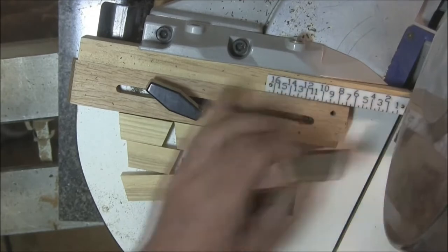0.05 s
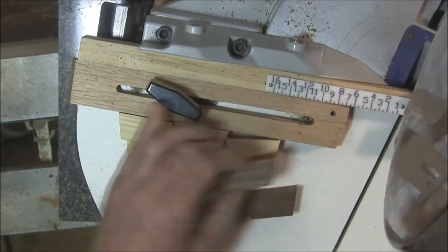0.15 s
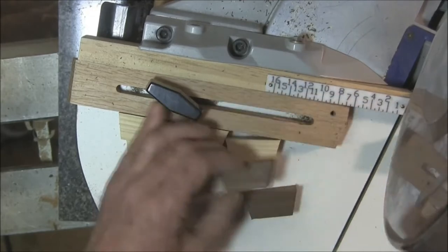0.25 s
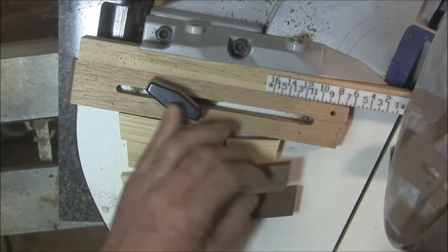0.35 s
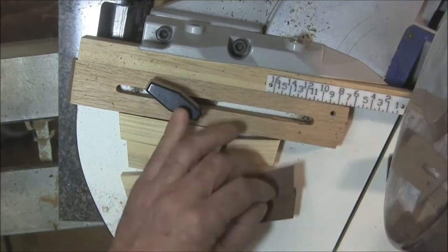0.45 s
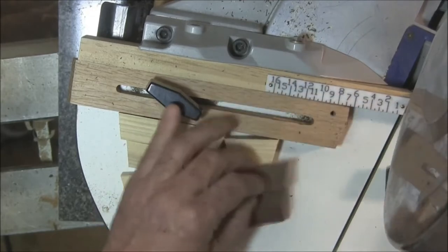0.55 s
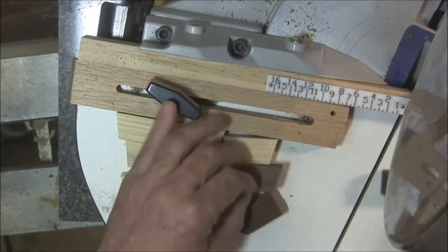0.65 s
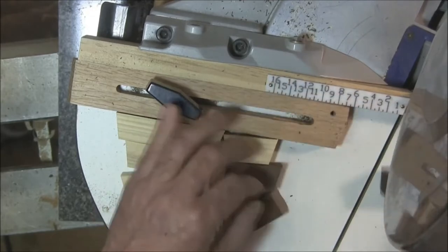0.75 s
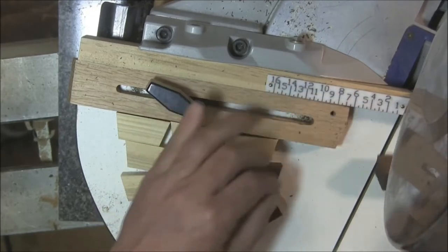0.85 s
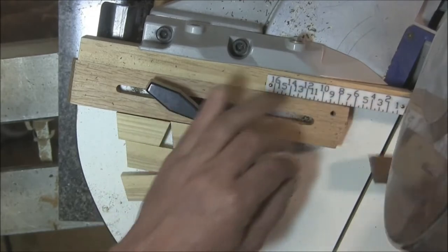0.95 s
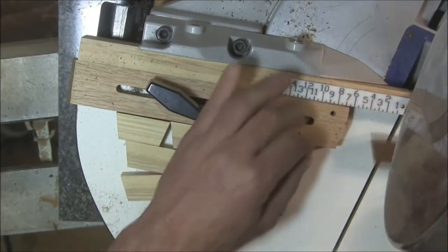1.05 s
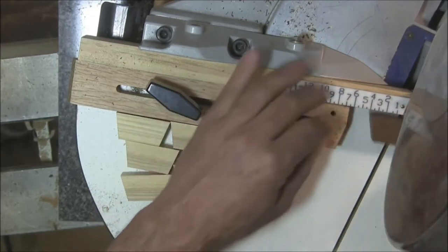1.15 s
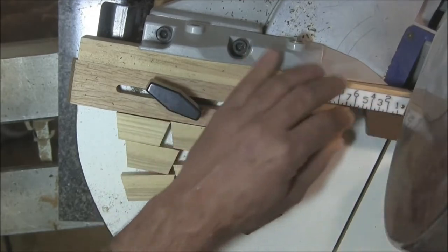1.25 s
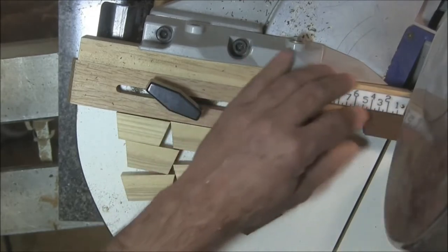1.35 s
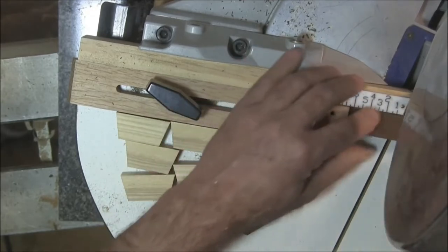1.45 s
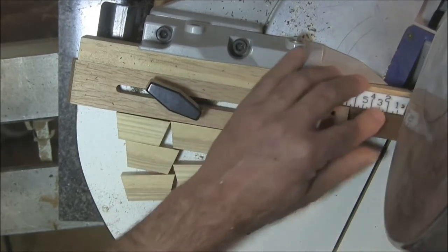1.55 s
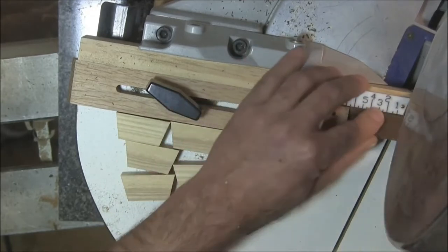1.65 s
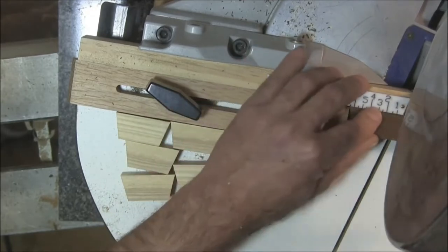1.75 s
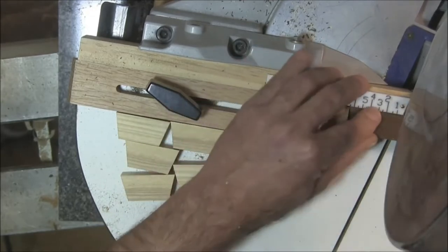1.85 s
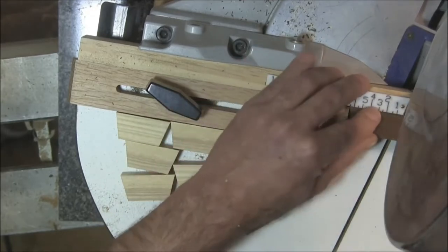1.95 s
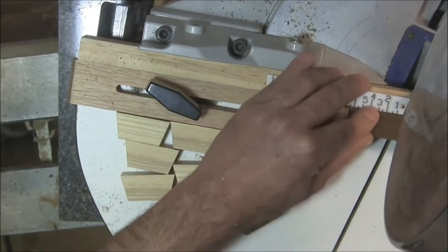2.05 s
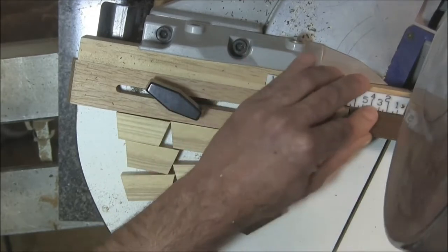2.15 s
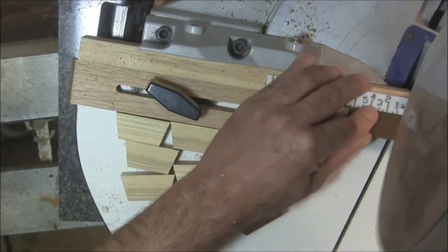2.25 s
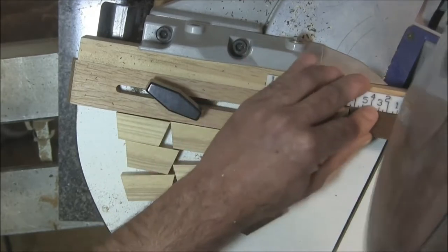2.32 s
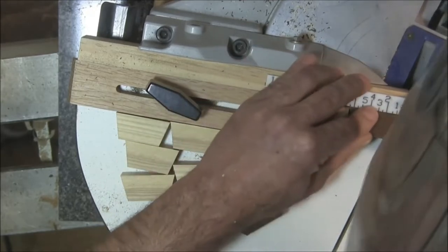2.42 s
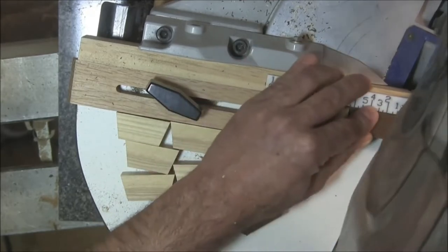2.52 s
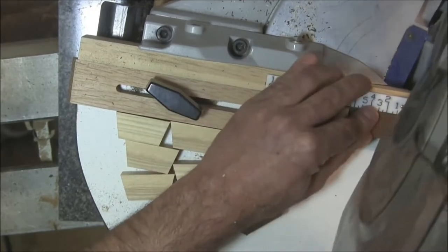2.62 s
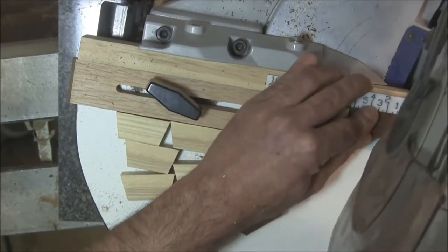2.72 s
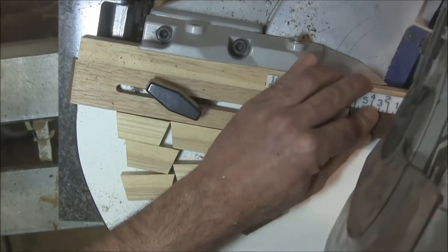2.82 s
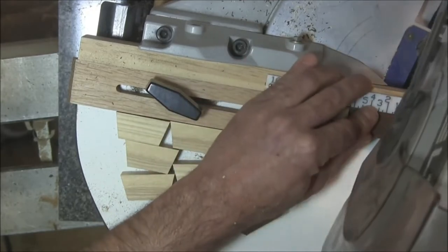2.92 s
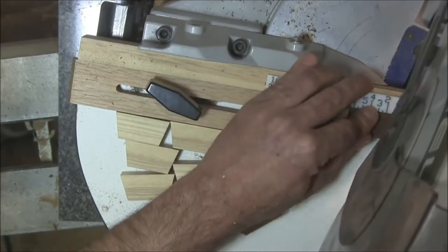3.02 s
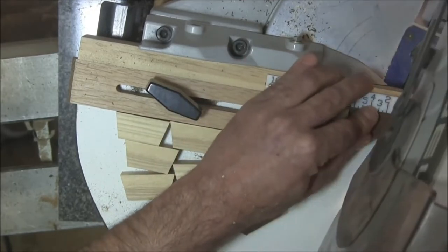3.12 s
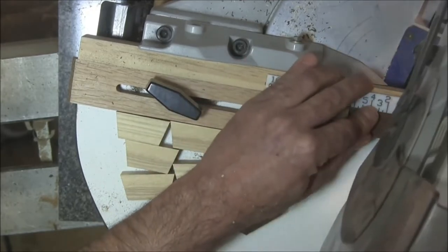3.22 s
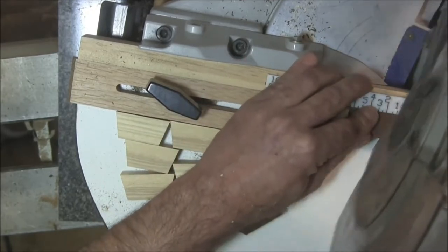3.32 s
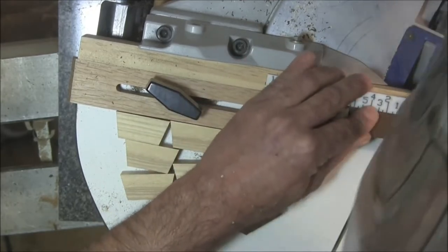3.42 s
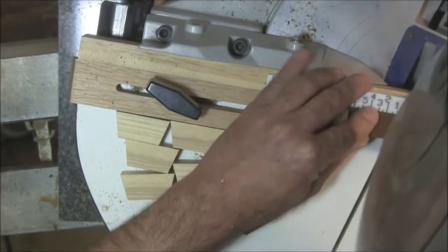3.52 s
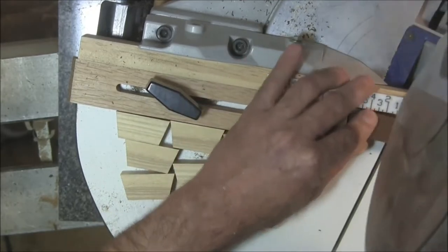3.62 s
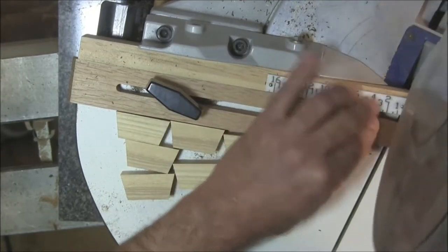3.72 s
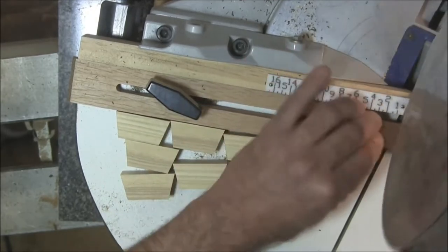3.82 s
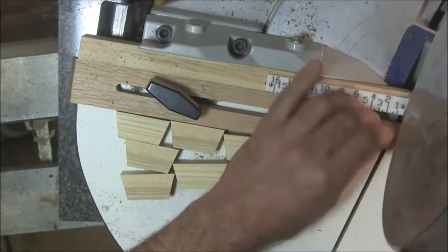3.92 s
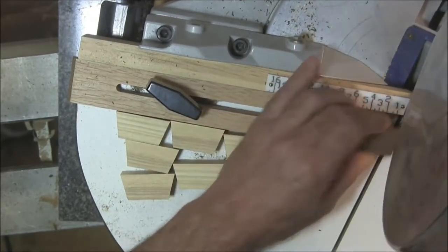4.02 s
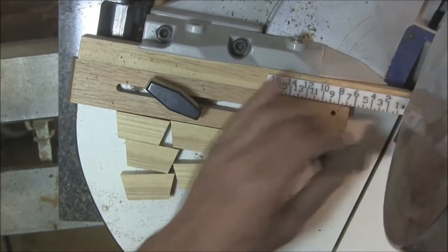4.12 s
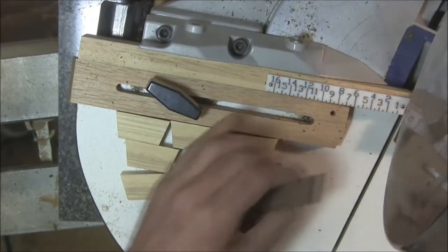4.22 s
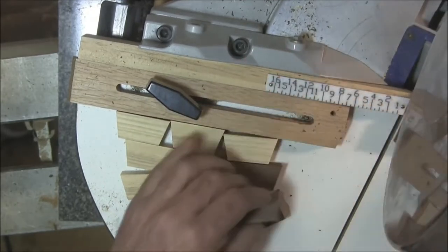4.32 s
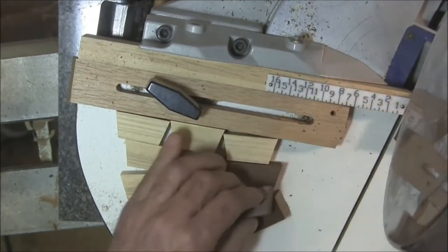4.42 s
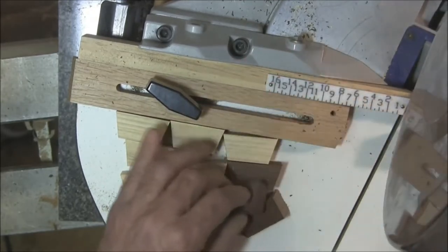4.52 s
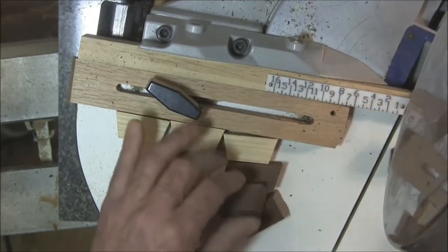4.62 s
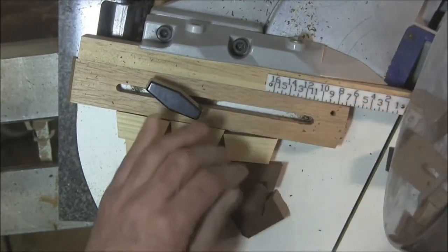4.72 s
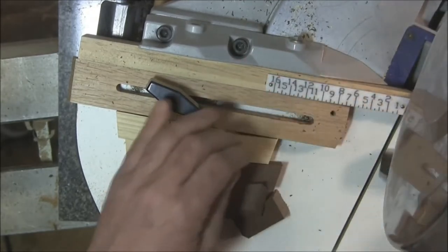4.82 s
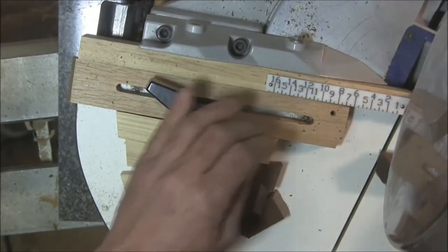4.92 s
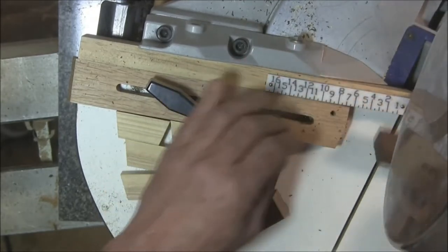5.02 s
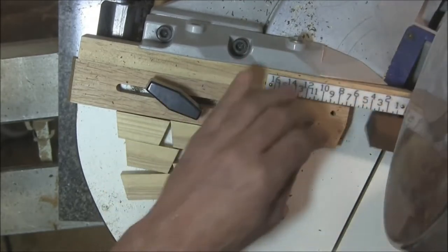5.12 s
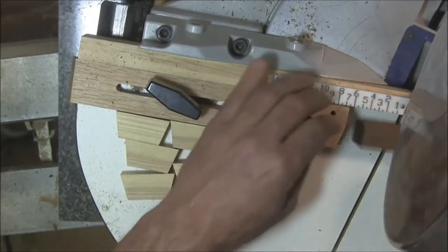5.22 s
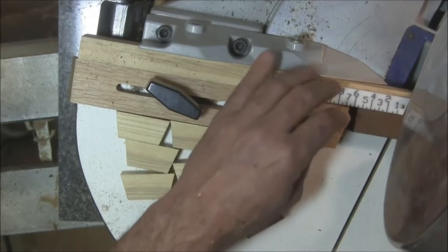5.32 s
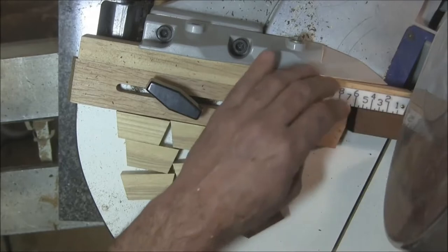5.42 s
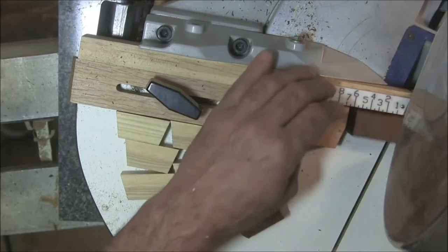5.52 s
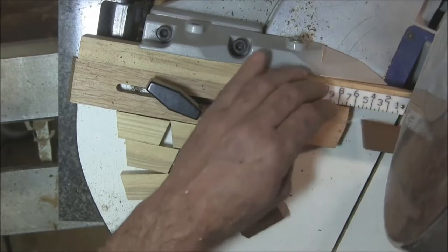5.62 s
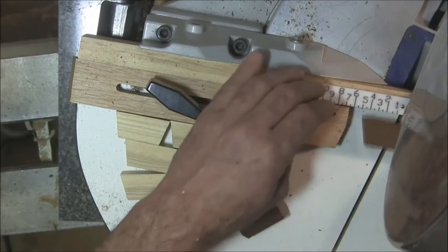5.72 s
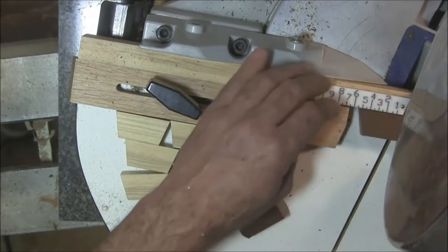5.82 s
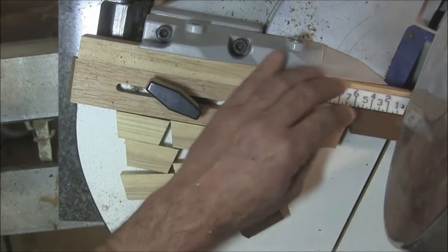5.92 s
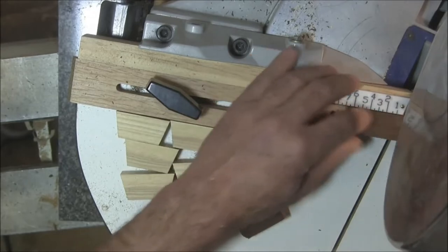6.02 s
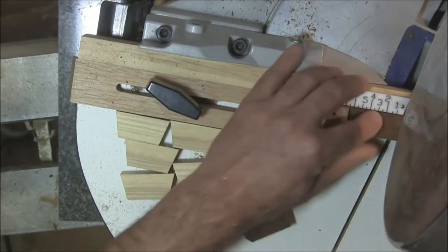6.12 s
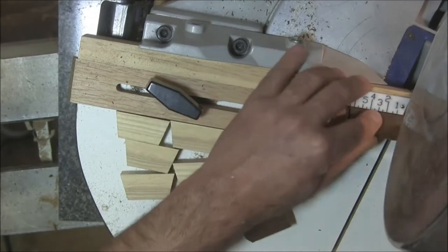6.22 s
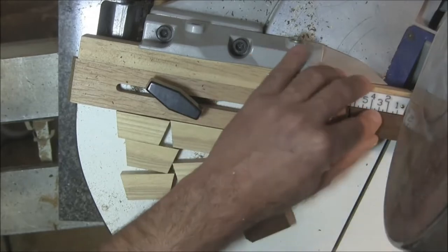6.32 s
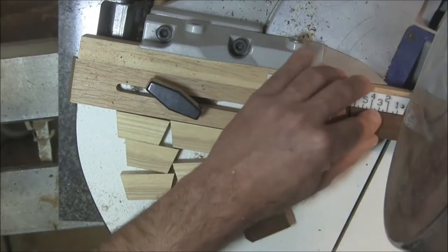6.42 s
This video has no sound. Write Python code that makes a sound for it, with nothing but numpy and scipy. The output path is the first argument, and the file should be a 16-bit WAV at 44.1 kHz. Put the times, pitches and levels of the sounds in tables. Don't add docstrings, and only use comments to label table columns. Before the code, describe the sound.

A close, dry mono pickup at a chop saw in a workshop. At the start the blade is already coasting from an earlier cut: a lowering geared whine and dry, hissing rattle, with a wooden knock at 0.15 s. Pieces click down at 0.7 s, rub softly until 1.0 s and settle with a thud. The motor grinds to a halt near 1.8 s with tiny squeaky ticks, leaving faint mains buzz. Light nudges come at 2.1-2.25 s. At 2.5 s the switch clunks and the motor surges up, humming and whining. Teeth bite at 2.9 s: a loud, rough tearing roar, deepest near 3.1 s, chips thumping the microphone, then chattering rubs to 3.45 s. Released around 3.57 s, the whine plunges, then slows gradually into a dry whir. Offcuts knock at 4.45, 4.7 and 5.3 s; a heavier knock and short scrape follow near 5.7 s, with small taps before the blade stops around 6.07 s.

```python
import sys
import numpy as np
from scipy import signal
from scipy.fft import rfft, irfft, next_fast_len
from scipy.io import wavfile
from scipy.ndimage import uniform_filter1d

SR = 44100
rng = np.random.default_rng(int(sys.argv[2]) if len(sys.argv) > 2 else 0)


def boost(x):
    u = np.asarray(x, float) / 20
    return 10 ** u


def transcribe(u):
    v = np.clip(np.atleast_2d(u).T, -1, 1)
    q = np.round(v * 32767).astype(np.int16)
    wavfile.write(sys.argv[1], SR, q)


N = 284870
TIME = np.arange(N) / SR
SIZE = next_fast_len(N + SR)
HZ = np.maximum(np.arange(SIZE // 2 + 1) * SR / SIZE, 1)

MAINS_HZ, FLICKER_HZ = 60, 5
GEAR_RATIO = 33 / 14
SWITCH_ON_S, SWITCH_OFF_S, EARLIER_OFF_S = 2.48, 3.568, -.731
# [from t/s, slot rate f/Hz, time constant/s]
PULL = [
    (2.48, 5260, .25),
    (2.87, 2500, .185),
    (3.08, 3260, .185),
    (3.2, 4000, .25),
]
STANDSTILL_S = [1.775, 6.07]

# [multiple of shaft or tooth rate, level/dB]
COMMUTATOR = [(11, 1), (22, 0), (33, -7), (44, -2), (55, -12), (66, 0), (77, -13), (88, -2.5), (99, -12),
              (110, -4), (132, -5), (154, -7), (176, -11), (198, -12), (209, -11), (231, -13)]
GEARS = [(2, -6), (3, 8.5), (4, -9), (5, -8), (6, 7), (7, -3), (9, -3), (11, -9), (12, -4), (13, -9),
         (15, -8), (18, -7), (21, -7.5), (23, -9), (27, -8), (30, -11)]
FIELD = [(9, -4), (18, 4)]
# [f/Hz, width/Hz, lift/dB]
CASING = [(300, -13.1), (700, -1.9), (1300, -7.2), (2000, 1.6), (2700, 8.0), (3600, 7.5), (4000, 5.2),
          (5000, 5.2), (6500, 2.7), (8000, -1.6), (11000, -6.3), (14000, -50)]
CASING_MODES = [(470, 50, 15), (535, 50, 12), (762, 60, 15), (1040, 90, 9.6), (1300, 80, 5.6),
                (1600, 150, 8), (2040, 120, 8), (3200, 300, 6.5), (4300, 150, 6), (4900, 200, 8),
                (6100, 250, 4.4)]
# [f/Hz, level/dB]
BRUSH_CAP_COLOUR = [(500, 3), (800, -5), (1200, -3), (1800, 4), (2500, 1), (3650, 5), (4100, -9),
                    (5600, -7), (7500, 2), (9800, -9), (11300, 5)]
GEARBOX_COLOUR = [(450, -0.5), (780, 2), (1050, -5), (1700, -5), (2100, -4), (2600, -0.5), (3250, -4.5),
                  (3900, 5), (8000, 4)]
# [t/s, level/dB]
SLAPS = [(3.247, -38), (3.274, -30), (3.285, -31), (3.296, -29.5), (3.315, -22.5), (3.325, -29),
         (3.334, -27), (3.342, -34), (3.357, -23.5), (3.378, -41.5), (3.404, -26), (3.433, -22),
         (3.449, -26), (3.465, -25), (3.49, -23), (3.508, -21), (3.523, -23.5), (3.542, -18), (3.556, -26),
         (3.569, -47), (3.578, -31.5)]

# [level/dB at 1000 Hz slot rate, dB per octave, dB lost at a crawl, dB per strain, dB with the head raised]
RUMBLE_LAW = (-53.5, 4.5, -1.5, -3.5, -4.5)
FRAME_LAW = (-53, 3, 5.5, 15.5, -3.5)
HOUSING_LAW = (-47.5, 4, 5.5, 1, 2)
BRUSH_LAW = (-44.5, 5, 16.5, -1, -4.5)
SLOT_LAW = (-53, 18, 0, -25, -6)
BAR_LAW = (-57.5, 9, -2.5, -20, -3.5)
FIELD_LAW = (-118, 36, 0, 0, 0)
MESH_LAW = (-57.5, 7.5, 9.5, 9, -5)
OVERTONE_LAW = (-58.5, 4.5, 10.5, 3.5, -10)

# [f/Hz, width/Hz, lift/dB]
MOTOR_COLOUR = [(25, -3.5), (70, -8), (240, -16), (400, -6), (1300, -8.5), (2500, -4.5), (4000, -7.5),
                (7000, -13.5), (9000, -21), (12200, -19.5), (13200, -30), (15300, -39.5)]
HOUSING = [(466.8, 5, 22.5), (532, 59, 17.5), (762, 130, 13.5), (983, 390, 9.5), (1630, 36, -3.5),
           (2102, 40, -4), (3140, 220, 3.5), (3745, 110, 3.5), (4420, 88, 8), (4800, 81, 10.5),
           (5020, 150, 8), (6090, 120, 7.5), (6640, 300, 5.5), (8700, 250, 3.5)]
BAND_EDGES_HZ = [300, 1300, 5600]
SHUDDER_DB = [-5, 6, -3.5, -14]
THROB = [0.11, 0.21, 0.13, 0.17]
# [t/s, level/dB]
STOPS = [
    (1.795, -69.5),
    (6.056, -68.5),
]
# [f/Hz, width/Hz, lift/dB]
BEARING = [(150, -103), (220, -80), (300, -66.5), (500, -60), (600, -66), (800, -90.5)]
RACE = [(7970, 200, 10), (8700, 200, 12), (8940, 140, 8)]
# [f/Hz, width/Hz, lift/dB]
GUARD = [(880, 60, 16), (1150, 90, 17), (1350, 120, 12), (1610, 60, 14), (3320, 80, 22), (4300, 200, 27),
         (5350, 150, 18), (6750, 180, 25)]
# [multiple of twice the mains rate, level/dB]
HUM = [(1, -1), (2, -19), (3, -15), (4, 1), (5, 4), (6, 4), (7, 0), (8, -6), (10, -4)]

# [t/s, level/dB]
CUT = [
    (2.83, -37),
    (2.85, -39.5),
    (2.896, -22.5),
    (2.924, -26),
    (3.127, -17.5),
    (3.237, -36.5),
    (3.26, -27),
    (3.33, -35),
    (3.45, -41.5),
]
# [f/Hz, width/Hz, lift/dB]
TEARING = [(18, -30.5), (30, 3.5), (296, -6), (437, -23.5), (472, -7), (597, -23.5), (881, 3.5), (1090, -5),
           (1560, -3.5), (3070, -10.5), (6530, -6), (10200, -7), (15300, -27.5)]
BLADE = [(1660, 66, -4.5), (2840, 60, -14.5), (3900, 160, -3.5), (4640, 60, -9), (4870, 44, -6.5),
         (5580, 58, -0.5), (6210, 360, -4), (6820, 430, -2.5), (7600, 180, -1), (8620, 190, -9),
         (9160, 60, -2.5), (9770, 60, -10.5), (9940, 21, -3.5), (10570, 40, -1.5)]
# [t/s, level above the tearing/dB]
SNAGS = [
    (2.868, 2),
    (2.891, 5.5),
    (2.942, 7),
    (2.985, 3),
    (3.021, -1),
    (3.254, 3.5),
    (3.28, 8),
    (3.338, 6.5),
    (3.376, 7),
    (3.43, 10),
]
# [t/s, level/dB]
SLIDE = [(0.74, -110), (0.78, -56.5), (0.97, -56), (1.0, -110), (2.13, -110), (2.14, -63), (2.19, -73.5),
         (2.22, -67.5), (2.23, -110), (5.675, -110), (5.685, -52.5), (5.74, -59.5), (5.8, -56),
         (5.815, -110)]
# [t/s, peak level/dB, ring f/Hz, tick level/dB, tick f/Hz]
KNOCKS = [(0.144, -44, 300, -46, 2960), (0.714, -38, 590, -46, 2000), (0.719, -31.5, 1220, -37, 1730),
          (1.0303, -39, 1790, -32, 3560), (2.130, -48, 850, -43, 12100), (2.1315, -63, 830, -47.5, 5700),
          (2.253, -70, 907, -68, 5500), (2.486, -39.5, 860, -46.5, 3080), (4.446, -43, 762, -38.5, 2927),
          (4.71, -33.5, 1000, -40, 3670), (4.715, -39, 990, -36, 1800), (5.271, -41, 525, -60, 4860),
          (5.279, -35.5, 570, -46, 4830), (5.3069, -34, 1240, -57, 3400), (5.667, -39, 600, -62, 3000),
          (5.670, -41, 553, -56, 2500), (5.6756, -38.5, 977, -28, 5100), (5.6767, -31, 930, -36, 3300),
          (5.882, -48.5, 720, -61, 3150), (5.963, -44.5, 948, -62, 2580)]
# [t/s, level/dB]
THUDS = [
    (0.147, -48),
    (0.717, -49),
    (1.028, -41),
    (2.125, -49),
    (2.483, -45),
    (4.71, -68),
    (5.27, -64),
    (5.674, -37),
    (5.959, -52),
]
# [t/s, peak level/dB]
CHIPS = [
    (0.147, -31),
    (1.032, -31),
    (5.676, -28.5),
    (2.918, -22),
    (2.968, -18.5),
    (3.015, -23),
    (3.054, -19.5),
    (3.071, -20.5),
    (3.099, -25),
    (3.274, -22),
]
# [f/Hz, level/dB]
ROOM = [(12, -31), (20, 4), (69, 2), (263, -15.5), (302, -5), (376, -24.5), (419, -15.5), (615, -14),
        (2060, -23), (12900, -38), (14000, -38.5)]
BUZZ = [(662.1, -87.5), (1981, -94.5), (2099, -101), (2218, -99), (4404, -102), (7337, -102), (10271, -103),
        (13205, -101)]
# [from level/dB rms, cut-off f/Hz]
BANDWIDTH = [(-200, 13600), (-36, 14450), (-29, 15280)]


def rms_one(x):
    return x / np.sqrt(np.mean(x ** 2) + 1e-20)


def in_time(rows):
    s, *columns = np.transpose(rows)
    return [np.interp(TIME, s, c) for c in columns]


def gate(start, end, edge):
    return np.clip((TIME - start) / edge, 0, 1) * np.clip(1 - (TIME - end) / edge, 0, 1)


def response(spectrum, peaks=(), lift_db=0):
    hz, db = np.transpose(spectrum)
    lift = 0
    for peak_hz, width, peak_db in peaks:
        height = boost(max(peak_db + lift_db, 0)) - 1
        lift = lift + height / (1 + (2 * (HZ - peak_hz) / width) ** 2)
    return boost(np.interp(np.log(HZ), np.log(hz), db)) * (1 + lift)


def colour(x, gain):
    return irfft(rfft(x, SIZE) * gain, SIZE)[:N]


def drift(rate_hz):
    return rms_one(colour(rng.standard_normal(N), 1 / (1 + (HZ / rate_hz) ** 2)))


def ring(clicks, hz, t60):
    r, w = boost(-60 / (t60 * SR)), 2 * np.pi * hz / SR
    return signal.lfilter([0, np.sin(w)], [1, -2 * r * np.cos(w), r * r], clicks + 1e-18)


def strikes(times, db):
    out = np.zeros(N)
    out[(np.asarray(times) * SR).astype(int)] = boost(np.asarray(db))
    return out


def push(clicks, rise_hz, fall_hz):
    smooth = signal.butter(2, rise_hz, fs=SR, output="sos")
    recover = signal.butter(2, fall_hz, "high", fs=SR, output="sos")
    return signal.sosfilt(np.vstack([smooth, recover]), clicks + 1e-18) * SR / (3 * rise_hz)


def tones(orders, turns, speed, wobble_db):
    flutter = boost(wobble_db * drift(23))
    out = 0
    for k, (multiple, db) in enumerate(orders):
        level = boost(db) * np.roll(flutter, 9001 * k) * (multiple * speed < .4 * SR)
        out = out + level * np.sin(2 * np.pi * multiple * turns + k * k)
    return out


def coast(off, friction_s):
    release_hz, brake_s, brake_goal_hz, brake_ends_hz = 3800, .4063, 353, 513
    friction_goal_hz = -1200
    knee = off + brake_s * np.log((release_hz - brake_goal_hz) / (brake_ends_hz - brake_goal_hz))
    braked = brake_goal_hz + (release_hz - brake_goal_hz) * np.exp((off - TIME) / brake_s)
    free = friction_goal_hz + (brake_ends_hz - friction_goal_hz) * np.exp((knee - TIME) / friction_s)
    return np.where(TIME < knee, braked, free)


def motor():
    pulled, goal = np.zeros(N), np.ones(N)
    for start, hz, lag in PULL:
        i = int(start * SR)
        pulled[i:] = hz + (pulled[i] - hz) * np.exp((start - TIME[i:]) / lag)
        goal[i:] = hz
    first, last = coast(EARLIER_OFF_S, 4.435), coast(SWITCH_OFF_S, 4.53)
    rate = np.select([TIME < SWITCH_ON_S, TIME < SWITCH_OFF_S], [first, pulled], last)
    strain = np.clip(1 - pulled / goal, 0, 1) * gate(SWITCH_ON_S, SWITCH_OFF_S, .01)
    return np.maximum(rate, 80), strain


def before_halt(lead, width):
    return sum(np.exp(-((TIME - stop + lead) / width) ** 2) for stop in STANDSTILL_S)


def turning():
    halt_s, spool_s = 0.0013, .03
    first = gate(-1, STANDSTILL_S[0], halt_s)
    second = gate(SWITCH_ON_S, STANDSTILL_S[1], halt_s) * gate(SWITCH_ON_S, 9, spool_s)
    after = sum((TIME > s) * boost(-7.5 - 60 * np.abs(TIME - s) / 0.5) for s in STANDSTILL_S)
    return np.maximum(first + second, after) * boost(-5 * before_halt(0.24, 0.08))


def follow(law, speed, strain):
    db, octave_db, crawl_db, strain_db, raised_db = law
    slots, raised = 11 * speed, gate(SWITCH_ON_S, PULL[1][0], .05)
    running_db = db + octave_db * np.log2(slots / 1000) - crawl_db * 200 / slots
    return boost(running_db + strain_db * strain + raised_db * raised)


def backlash():
    loose = gate(PULL[-1][0], SWITCH_OFF_S, 0.04)
    s, db = np.transpose(SLAPS)
    bump = np.exp(-(np.arange(-600, 601) / SR / 0.0037) ** 2)
    bursts = boost(-25.5) + signal.fftconvolve(strikes(s, db + 26), bump, "same")
    driven = boost(-6.5 * gate(SWITCH_ON_S, PULL[-1][0], .03))
    return loose, loose * bursts + (1 - loose) * driven


def commutator(turns, speed, strain):
    slot = tones(COMMUTATOR[:1], turns, speed, wobble_db=2.2)
    upper = tones(COMMUTATOR[1:], turns, speed, wobble_db=2.2)
    powered_db = -44 * gate(SWITCH_ON_S - 1, SWITCH_OFF_S, .3) * (TIME > 2)
    late_db = -17 * (gate(3.87, 9, 0.1) + (TIME < SWITCH_ON_S))
    slot = slot * boost(powered_db + late_db)
    return follow(SLOT_LAW, speed, strain) * slot + follow(BAR_LAW, speed, strain) * upper


def gears(turns, speed, strain, powered, loose, chatter):
    jitter = .019 * (.25 + powered * (.25 + loose))
    teeth = GEAR_RATIO * turns + jitter * drift(90)
    tooth_rate = GEAR_RATIO * speed
    mesh = follow(MESH_LAW, speed, strain) * tones(GEARS[:3], teeth, tooth_rate, wobble_db=3)
    overtones = follow(OVERTONE_LAW, speed, strain) * tones(GEARS[3:], teeth, tooth_rate, wobble_db=3)
    runout = 1 + .45 * np.cos(2 * np.pi * teeth / 3)
    return chatter * runout * (boost(-4.5 * loose) * mesh + overtones)


def whine(turns, speed, strain):
    powered = gate(SWITCH_ON_S, SWITCH_OFF_S, 0.086)
    buried = turning() * boost(-20 * gate(PULL[1][0], PULL[-1][0] + 0.052, 0.019))
    loose, chatter = backlash()
    bars = buried * commutator(turns, speed, strain)
    pull = tones(FIELD, turns + .02 * drift(72), speed, wobble_db=0.5)
    field = buried * powered * (1 - loose) * follow(FIELD_LAW, speed, strain) * pull
    mesh = buried * gears(turns, speed, strain, powered, loose, chatter)
    mixed = colour(bars, response(BRUSH_CAP_COLOUR)) + field + colour(mesh, response(GEARBOX_COLOUR))
    return colour(mixed, response(CASING, CASING_MODES))


def rattle(turns, speed, strain):
    powered = (TIME > SWITCH_ON_S) * (TIME < SWITCH_OFF_S)
    turn = np.cos(2 * np.pi * turns * GEAR_RATIO / 3)
    mains = np.cos(4 * np.pi * MAINS_HZ * TIME) + np.cos(2 * np.pi * MAINS_HZ * TIME)
    grit = rng.standard_normal(N) * boost(1.6 * drift(1400)) * (1 + 0.16 * powered * mains)
    below = [0] + [1 / (1 + (HZ / edge) ** 8) for edge in BAND_EDGES_HZ] + [1]
    body, shared = response(MOTOR_COLOUR, HOUSING), drift(FLICKER_HZ)
    shudder = before_halt(0.071, 0.058)
    laws = RUMBLE_LAW, FRAME_LAW, HOUSING_LAW, BRUSH_LAW
    out = 0
    for law, db, depth, low, high in zip(laws, SHUDDER_DB, THROB, below, below[1:]):
        band = rms_one(colour(grit, body * np.sqrt(high - low)))
        flicker = boost(db * shudder + 0.98 * shared + 0.58 * drift(2 * FLICKER_HZ))
        out = out + follow(law, speed, strain) * (1 + depth * turn) * flicker * band
    return turning() * out


def cut():
    db, = in_time([(CUT[0][0] - .02, -110)] + CUT + [(CUT[-1][0] + 0.017, -110)])
    dull_db = np.minimum(-4 - 0.49 * (db + 25.5), 12)
    grains = rng.standard_normal(N) * boost(3.0 * drift(600) + 0.36 * drift(45))
    snag_t60_s = 0.08
    snags = signal.lfilter([1], [1, -boost(-60 / (snag_t60_s * SR))], strikes(*np.transpose(SNAGS)) + 1e-18)
    grains = grains * (1 + 0.36 * snags)
    slowed = np.clip(.5 + .5 * drift(4.0), 0, 1)
    free = response(TEARING, BLADE, lift_db=13.5)
    bent = response(TEARING, [(hz * .97, width, peak_db) for hz, width, peak_db in BLADE], lift_db=13.5)
    full = colour(grains * np.sqrt(1 - slowed), free) + colour(np.roll(grains, 999) * np.sqrt(slowed), bent)
    dull = colour(full, 1 / (1 + (HZ / 3000) ** 4))
    bright = full - dull
    return boost(db - 1.1) * (bright + boost(dull_db) * dull) / np.std(bright)


def guard():
    shake = rng.standard_normal(N) * boost(5.4 * drift(40))
    sheet = [(600, -30), (800, 0), (1700, 0), (2200, -20), (3000, 0), (7000, 0), (9000, -40)]
    sung = rms_one(colour(shake, response(sheet, GUARD)))
    return boost(-41) * gate(SWITCH_ON_S + .03, SWITCH_OFF_S - .1, .1) * sung


def hum():
    start_db, fall_db_per_s, steady_db, attack_s = -44, 59.5, -56, 0.096
    db = np.maximum(start_db - fall_db_per_s * (TIME - SWITCH_ON_S - attack_s), steady_db)
    level = gate(SWITCH_ON_S, SWITCH_OFF_S - .03, attack_s) * boost(np.minimum(db, start_db))
    return level * tones(HUM, 2 * MAINS_HZ * TIME, 0, wobble_db=3)


def bearing(turns, slots):
    hz, db = np.transpose(BEARING)
    throb = .4 + np.cos(np.pi * turns * GEAR_RATIO / 3) ** 4
    band = response([(6500, -31), (7600, 3.5), (9000, -1.5), (9600, -29)], RACE)
    hiss = rms_one(colour(rng.standard_normal(N), band))
    return boost(np.interp(slots, hz, db)) * throb * hiss * (1 - gate(SWITCH_ON_S - .1, SWITCH_OFF_S, .01))


def squeaks(turns, speed):
    out = np.zeros(N)
    spots = (0, 12300, .012, -2, .85), (.14, 12400, .012, -2, .85), (.45, 8300, .004, -7, 1.3)
    for lead, hz, t60, own_db, rise in spots:
        clicks = np.zeros(N)
        for stop, db in STOPS:
            left = np.floor((turns[int(stop * SR)] - turns) * GEAR_RATIO / 3 - lead)
            near = (left > -2) * (left < 40)
            clicks[1:] += boost(db + own_db) * (np.diff(left) < 0) * near[1:]
        hardness = (speed / 8) ** rise * boost(rng.normal(0, 2.0, N))
        out += ring(clicks * hardness, hz, t60)
    return out


def wood_ring(crack, hz, modes):
    rung = sum(boost(db) * ring(crack, hz * ratio, t60) for ratio, db, t60 in modes)
    return rung / abs(rung).max()


def knocks():
    low_modes = (1.03, -4.0, 0.066), (0.81, -12, 0.0029), (1.1, 1.5, 0.007), (1.92, -1.5, 0.0054)
    high_modes = (1.05, 9.0, 0.0016), (0.52, 0.5, 0.006), (0.9, -16.0, 0.0021), (1.014, 15.5, 0.0049)
    contact_s, splinter_t60_s = 0.00041, 0.0088
    out = -push(strikes(*np.transpose(THUDS)), rise_hz=46.0, fall_hz=26)
    age = np.arange(3000) / SR
    shape = (1 - np.exp(-age / contact_s)) * boost(-60 * age / splinter_t60_s)
    for at, level_db, pitch_hz, high_db, high_hz in KNOCKS:
        crack = rng.standard_normal(3000) * shape
        i = int(at * SR)
        out[i:i + 3000] += boost(level_db + 2.5) * wood_ring(crack, pitch_hz, low_modes)
        out[i:i + 3000] += boost(high_db + 6.5) * wood_ring(crack, high_hz, high_modes)
    return colour(out, 1 / (1 + (HZ / 10000) ** 4))


def chips():
    return push(strikes(*np.transpose(CHIPS)), rise_hz=324, fall_hz=59.4)


def slide():
    rub = response([(300, -15.5), (900, -1.0), (2500, -15), (4500, -13.5),
                    (5600, -8.0), (6800, -16.5), (10000, -31.5)])
    return boost(in_time(SLIDE)[0]) * rms_one(colour(rng.standard_normal(N), rub))


def reverb(x, t60, wet_db):
    age = np.arange(SR // 2) / SR
    tail = rng.standard_normal(len(age)) * boost(-60 * age / t60) * (age > .004)
    walls = rfft(tail / np.linalg.norm(tail), SIZE) / (1 + HZ / 6000)
    return x + boost(wet_db) * colour(x, walls)


def workshop():
    beat = np.maximum(np.cos(4 * np.pi * MAINS_HZ * TIME), 0) ** 6.0
    beat = beat * (1 + .6 * np.cos(2 * np.pi * 28 * TIME))
    air = rms_one(colour(rng.standard_normal(N) * (1 + 0.56 * beat), response(ROOM)))
    lines = sum(np.sqrt(2) * boost(db) * np.sin(2 * np.pi * hz * TIME) for hz, db in BUZZ)
    return boost(-70.5) * air + lines


def scene():
    slots, strain = motor()
    speed = slots / 11
    turns = np.cumsum(speed) / SR
    tonal = whine(turns, speed, strain) + hum() + squeaks(turns, speed)
    saw = reverb(tonal, t60=0.088, wet_db=-6.0) + rattle(turns, speed, strain) + guard() + bearing(turns, slots)
    wood = cut() + reverb(knocks(), t60=0.037, wet_db=-7.5) + chips() + slide()
    mono = saw + wood + workshop()
    return np.array([mono, mono])


def top_cut(x):
    return signal.sosfilt(signal.butter(12, 15490, fs=SR, output="sos"), x)


def record(dry):
    ceiling = .21
    x = ceiling * np.tanh(dry[0] / ceiling)
    level_db = 10 * np.log10(uniform_filter1d(x ** 2, size=3000) + 1e-12)
    dull = 0
    for from_db, cut_hz in BANDWIDTH:
        wider = uniform_filter1d(1. * (level_db > from_db), size=300, mode="nearest")
        dull = dull + wider * (colour(x, HZ < cut_hz) - dull)
    return top_cut(np.array([dull, dull]))


dry = scene()
out = record(dry)
transcribe(out)
```